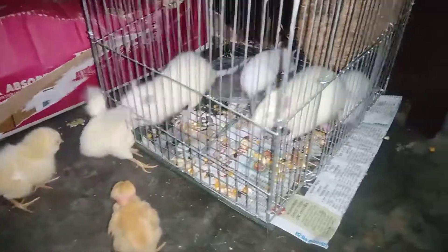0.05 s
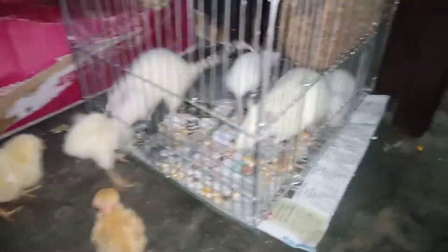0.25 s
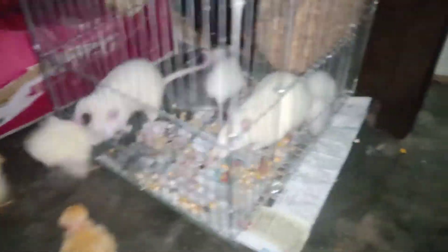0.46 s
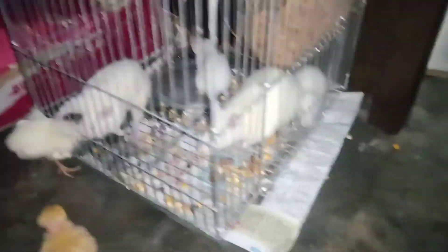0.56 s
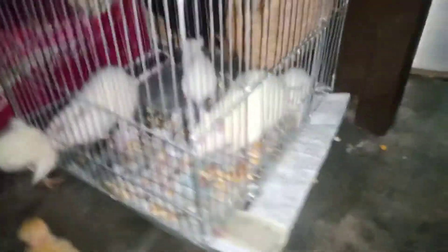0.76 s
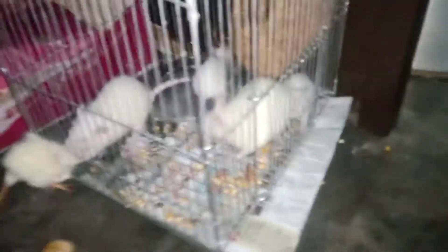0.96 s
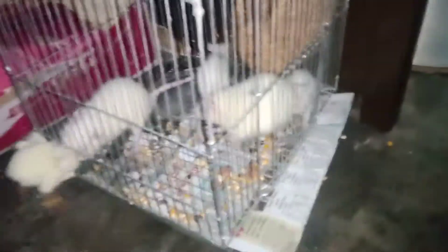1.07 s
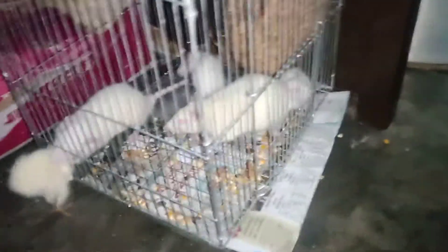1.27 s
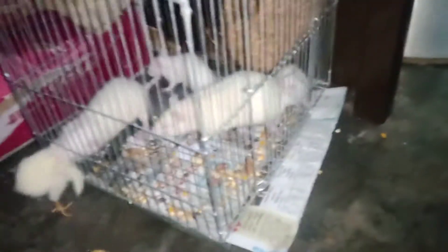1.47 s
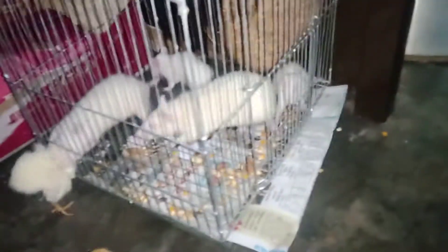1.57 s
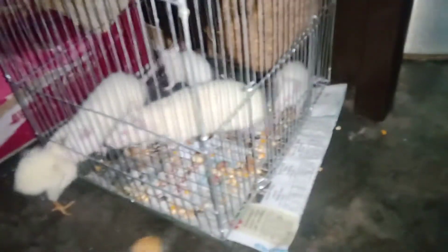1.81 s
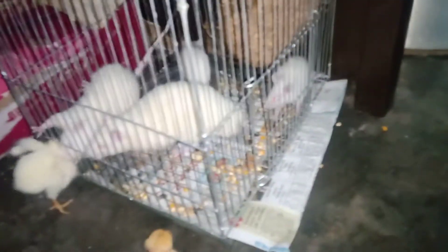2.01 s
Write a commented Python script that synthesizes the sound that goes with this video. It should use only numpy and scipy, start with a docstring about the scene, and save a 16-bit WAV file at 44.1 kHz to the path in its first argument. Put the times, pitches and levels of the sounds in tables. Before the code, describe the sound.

Chicks peep in a bare, reverberant room. A faint chirp opens; from 0.2 to 0.5 seconds a loud, piercing, slightly hoarse peep holds, ends sharply and tails downward by 0.7. A small wire tick comes at 0.77. Softer overlapping peeps follow at 0.95-1.24 and 1.45-1.78, sliding down; another begins just after 2.0. Faint hush, hum and low rumble lie beneath.

```python
"""A few chicks peep on the concrete floor of a bare room, beside a wire cage; their whistles overlap and ring
on. Each peep is a gliding sine with a faint octave, roughened here and there by short bands of noise; a brief
scuff sounds near 0.49 s. A beak ticks once on the cage: a noise crack and damped wire modes. Decaying noise
stands for the reflections. Beneath lie filtered noises: a flickering hush, a faint hum, a low rumble and the
fading wash of an earlier sound. A gain control turns down loud passages."""
import sys
import numpy as np
from scipy import signal
from scipy.io import wavfile

SR = 44100
rng = np.random.default_rng(int(sys.argv[2]) if len(sys.argv) > 2 else 0)


def to_wav(s):
    """Save 16-bit WAV."""
    ch = np.atleast_2d(s).T  # columns
    pcm = np.round(np.clip(ch, -1, 1) * 32767)  # PCM
    wavfile.write(sys.argv[1], SR, pcm.astype(np.int16))


def undo_db(level):
    """Turn decibels back into plain size, where 20 dB means ten times bigger."""
    steps = np.asarray(level, float) / 20
    return 10 ** steps


N = 90404
ROOM_T60_S = 0.81  # time for the room's broadband sound to fall by 60 dB


def band(x, low_hz, high_hz):
    """Linear filtering: a Butterworth band-pass keeps the energy between two frequencies."""
    return signal.sosfilt(signal.butter(2, [low_hz, high_hz], "band", fs=SR, output="sos"), x)


def drift(rate):
    """Low-passed random process: two equal poles at rate (Hz) smooth white noise, scaled to spread 1."""
    r = np.exp(-2 * np.pi * rate / SR)
    white = rng.standard_normal(N + SR)
    slow = signal.lfilter([1], [1, -2 * r, r * r], white)[SR:]  # the first second settles the filter
    return (slow - slow.mean()) / slow.std()


def ring(x, hz, t60):
    """Damped resonance: a unit click sets off a decaying sine of starting height 1."""
    r = 10 ** (-3 / (t60 * SR))
    w = 2 * np.pi * hz / SR
    return signal.lfilter([0, np.sin(w)], [1, -2 * r * np.cos(w), r * r], x + 1e-18)


def linger():
    """Reverberant decay: the broad wash of an earlier sound dies exponentially with the room."""
    start_db, low_hz, high_hz = -40, 1070, 6500
    wash = band(rng.standard_normal(N), low_hz, high_hz)
    t = np.arange(N) / SR
    return undo_db(start_db - 60 * t / ROOM_T60_S) * wash / wash.std()


def rumble():
    """Amplitude-modulated noise: a low band rises and falls along a level curve."""
    # Each row: time in seconds, level in dB.
    rumble_levels = [(0.0, -59.5), (0.159, -50), (0.27, -68), (0.471, -65), (0.54, -59.5), (1.35, -51),
                     (1.422, -56), (2.05, -61.5)]
    low_hz, high_hz = 68.6, 189
    low = band(rng.standard_normal(N), low_hz, high_hz)
    low = band(low, low_hz, high_hz * 2)
    return low / low.std() * undo_db(np.interp(np.arange(N) / SR, *np.transpose(rumble_levels)))


def hush():
    """Spectral shaping of noise: flickering third-octave bands, plus a hum from a narrow resonance."""
    # Spectrum of the hush. Each row: frequency in Hz, relative density in dB per Hz.
    hush_spectrum = [(130, -55.5), (220, -12.5), (367, 0), (700, -5.5), (800, -7), (1810, -13.5),
                     (4250, -15), (6680, -13.5), (8000, -28.5), (10400, -60)]
    hush_db, flicker_db, flicker_per_s = -43.5, 2.3, 5.1
    hum_hz, hum_width_hz, hum_db = 352, 22, -53
    edges = 160 * 2 ** np.arange(0, 6, 1 / 3)
    white = rng.standard_normal((2, N))  # neighbouring bands draw on different noises
    f, db = np.transpose(hush_spectrum)
    flicker = [drift(flicker_per_s) for _ in range(5)]  # every fifth band shares one
    out = np.zeros(N)
    for k, (low, high) in enumerate(zip(edges, edges[1:])):
        density_db = np.interp(np.log(low * high) / 2, np.log(f), db)
        out += band(white[k % 2], low, high) * undo_db(density_db + flicker_db * flicker[k % 5])
    hum_t60 = np.log(1000) / (np.pi * hum_width_hz)  # a narrower resonance rings longer
    hum = ring(rng.standard_normal(N), hum_hz, hum_t60)
    return undo_db(hush_db) * out / out.std() + undo_db(hum_db) * hum / hum.std()


def room(x):
    """Diffuse reverberation: convolution with noise that builds up quickly and decays exponentially."""
    room_db, onset_s = -6, 0.0041
    # the walls favour this band; its added part dies sooner than the rest
    bright_hz, bright_width_hz, bright_db, bright_t60_s = 3920, 920, 1, 0.63
    t = np.arange(SR) / SR
    noise = rng.standard_normal(SR) * np.clip(t / onset_s, 0, 1)
    bright = band(noise, bright_hz - bright_width_hz / 2, bright_hz + bright_width_hz / 2)
    tail = noise * undo_db(-60 * t / ROOM_T60_S)
    tail = tail + bright * undo_db(bright_db - 60 * t / bright_t60_s)
    tail = tail / np.sqrt(np.sum(tail ** 2))  # unit energy
    return undo_db(room_db) * signal.fftconvolve(x, tail)[:N]


def cage_tick():
    """Impact excitation: a beak's click makes a short noise crack and sets the wire modes ringing."""
    # Beak on the cage. Each row: time in seconds, strength of the click in dB.
    beak_clicks = [(.7679, -13.5)]
    # Wire modes. Each row: frequency in Hz, level in dB relative to the click, 60 dB decay time in seconds.
    wire_modes = [(900, -18, .012), (1900, -11, .02), (2800, -8, .008), (4600, -14, .01), (6500, -11, .012),
                  (7700, -16, .008)]
    crack_db, crack_t60_s, crack_low_hz = -3, .025, 800
    clicks = np.zeros(N)
    for s, db in beak_clicks:
        clicks[int(s * SR)] = undo_db(db)
    t = np.arange(SR // 10) / SR
    noise = band(rng.standard_normal(len(t)), crack_low_hz, .4 * SR)
    crack = undo_db(crack_db - 60 * t / crack_t60_s) * noise
    wires = sum(undo_db(db) * ring(clicks, hz, t60) for hz, db, t60 in wire_modes)
    return np.convolve(clicks, crack)[:N] + band(wires, crack_low_hz / 2, .4 * SR)


def rasps():
    """Aperiodic voicing: short windowed bands of noise make hoarse breaks in the peeps, and a brief scuff
    sounds near 0.49 s."""
    # Each row: start in seconds, length in seconds, middle in Hz, width in Hz, level in dB before windowing.
    noise_bursts = [(0.222, 0.0078, 6640, 967, -30.5), (0.279, 0.05, 7160, 700, -25.5),
                    (0.482, 0.017, 5300, 1580, -33.5), (0.493, 0.031, 5830, 800, -34.5),
                    (1.489, 0.046, 6500, 1390, -40)]
    out = np.zeros(N)
    for s, length, hz, width_hz, db in noise_bursts:
        noise = band(rng.standard_normal(SR // 4), hz - width_hz / 2, hz + width_hz / 2)[SR // 8:]
        n, start = int(length * SR), int(s * SR)
        out[start:start + n] = undo_db(db) * noise[:n] / noise.std() * np.hanning(n) ** .5
    return out


def chicks():
    """Frequency modulation: gliding, fluttering sines with an octave; rows: direct sound, sound sent round the room."""
    # One list a peep. Each row: time in seconds, pitch in Hz, RMS level of the fundamental in dB.
    peep_tracks = [
        [(.022, 5850, -50), (.034, 6150, -30), (.055, 6650, -44), (.07, 6350, -37), (.093, 6120, -33),
         (.105, 5600, -44), (.125, 4100, -52)],
        [(.288, 6950, -24.5), (.312, 7020, -18), (.335, 7110, -16.5), (.353, 6950, -22.5)],
        [(.615, 5600, -52), (.665, 4400, -47)],
        [(1.545, 5300, -52), (1.585, 4850, -51), (1.625, 4500, -55)],
        [(.18, 5925, -47.5), (.19, 6170, -27.5), (.2, 6425, -41), (.214, 6760, -22), (.222, 6815, -25),
         (.228, 6850, -19), (.248, 6864, -15.5), (.274, 6705, -11), (.318, 6867, -8.5), (.352, 6576, -8.5),
         (.38, 6547, -7), (.45, 6508, -10.5), (.463, 6508, -5), (.475, 6427, -18.5), (.5, 6148, -21.5),
         (.526, 6110, -26.5), (.545, 6320, -28.5), (.61, 6060, -43.5), (.628, 6040, -39), (.65, 5870, -30.5),
         (.664, 5200, -33), (.676, 4336, -28), (.693, 3772, -33.5), (.705, 3680, -45)],
        [(.5, 6510, -59), (.52, 6554, -15), (.535, 6976, -28.5), (.57, 7290, -48), (.585, 6660, -60)],
        [(.946, 6220, -39), (.967, 6400, -35), (.985, 6250, -36), (1.0, 5880, -37)],
        [(.955, 5600, -63.5), (.975, 4830, -46), (.99, 4370, -41)],
        [(.968, 6950, -46), (.985, 7030, -43), (1.005, 6800, -48), (1.025, 6450, -51)],
        [(.946, 5690, -41.5), (.965, 5820, -36.5), (.98, 5600, -41.5), (.992, 4885, -25.5), (1.005, 4800, -28),
         (1.04, 5250, -33.5), (1.07, 5740, -33)],
        [(1.01, 3970, -48), (1.03, 4470, -45.5), (1.048, 5080, -26.5)],
        [(1.042, 5704, -31.5), (1.085, 5800, -34), (1.128, 5860, -25.5), (1.144, 5310, -27.5),
         (1.151, 5330, -37), (1.158, 4900, -21), (1.178, 4235, -20), (1.197, 3873, -26.5), (1.212, 3748, -25.5),
         (1.228, 3210, -29), (1.24, 2910, -53)],
        [(1.448, 4952, -34), (1.466, 5536, -27.5), (1.481, 6040, -33.5), (1.492, 6280, -38.5)],
        [(1.45, 6480, -54), (1.48, 6600, -40.5), (1.51, 6590, -38), (1.53, 6800, -53), (1.57, 7060, -49),
         (1.59, 6750, -43.5), (1.64, 6740, -45), (1.687, 6640, -34.5), (1.7, 5855, -40), (1.722, 5300, -26),
         (1.748, 4620, -46)],
        [(1.526, 5980, -37.5), (1.542, 6090, -31), (1.57, 6090, -28.5), (1.59, 5800, -34), (1.62, 5630, -30.5),
         (1.664, 5185, -22), (1.686, 5203, -25.5), (1.7, 4840, -29.5), (1.74, 4666, -19), (1.76, 4130, -30),
         (1.785, 2880, -43.5)],
        [(2.018, 4600, -31), (2.03, 5200, -33), (2.055, 5400, -30)],
        [(2.017, 6720, -46), (2.055, 6720, -41)],
    ]
    edge_s, octave_db = 0.0038, -24  # a peep swells and stops within edge_s
    flutter_db, flutter_per_s, waver_hz = 2, 104, 15
    # loud notes are aimed at the microphone: of their dB above this, the room misses a share
    aimed_from_db, aimed_share = -25.5, 0.54
    t = np.arange(N) / SR
    out = np.zeros((2, N))
    soft = np.hanning(int(edge_s * SR) + 3)
    soft = soft / soft.sum()
    for rows in peep_tracks:
        s, hz, db = np.transpose(rows)
        pitch = np.convolve(np.interp(t, s, hz), soft, "same") + waver_hz * drift(flutter_per_s)
        phase = 2 * np.pi * (np.cumsum(pitch) / SR + rng.random())
        level_db = np.interp(t, s, db)
        sounding = (t > s[0]) * (t < s[-1])
        swell = np.convolve(undo_db(level_db) * sounding, soft, "same")
        swell = swell * undo_db(flutter_db * drift(flutter_per_s))
        voice = np.sqrt(2) * swell * (np.sin(phase) + undo_db(octave_db) * np.sin(2 * phase))
        missed_db = aimed_share * np.maximum(level_db - aimed_from_db, 0)
        out += [voice, voice * undo_db(-missed_db)]
    return out


def scene():
    """Superposition: direct, reflected and background pressures add at one microphone, fed to two channels."""
    birds, sent = chicks() + rasps()
    tick = cage_tick()
    reflected = room(sent + undo_db(6.5) * tick)  # the cage radiates all round: its share is raised by 6.5 dB
    mix = birds + tick + reflected + hush() + rumble() + linger()
    return np.tile(mix, (2, 1))


def top_cut(x):
    """Nothing passes above the cut-off."""
    return signal.sosfilt(signal.butter(12, 8330, fs=SR, output="sos"), x)


def record(dry):
    """Dynamic compression and low-pass filtering: loud passages are turned down, the treble cut steeply."""
    hold_down_from_db, hold_down_share = -24, 0.51
    level_smoothing_s, gain_smoothing_s = 0.012, 0.01
    rolloff_hz, cutoff_hz = 8080, 8766  # gentler edge; frequency from which 50 dB are taken off
    a = np.exp(-1 / (level_smoothing_s * SR))
    r = np.exp(-1 / (gain_smoothing_s * SR))
    power = signal.lfilter([1 - a], [1, -a], dry[0] ** 2)
    level_db = 10 * np.log10(power + 1e-9)
    cut_db = hold_down_share * np.maximum(level_db - hold_down_from_db, 0)
    x = dry * undo_db(-signal.lfilter([1 - r], [1, -r], cut_db))
    x = signal.sosfilt(signal.butter(6, rolloff_hz, fs=SR, output="sos"), x)
    x = signal.sosfilt(signal.cheby2(10, 50, cutoff_hz, fs=SR, output="sos"), x)
    return top_cut(x)


dry = scene()
out = record(dry)
to_wav(out)
```